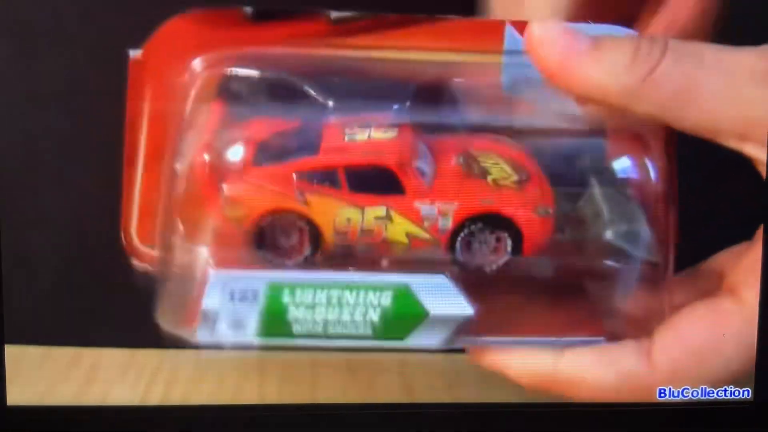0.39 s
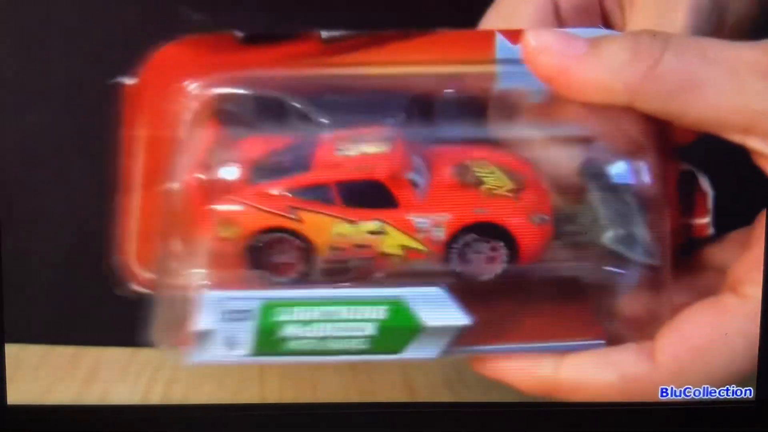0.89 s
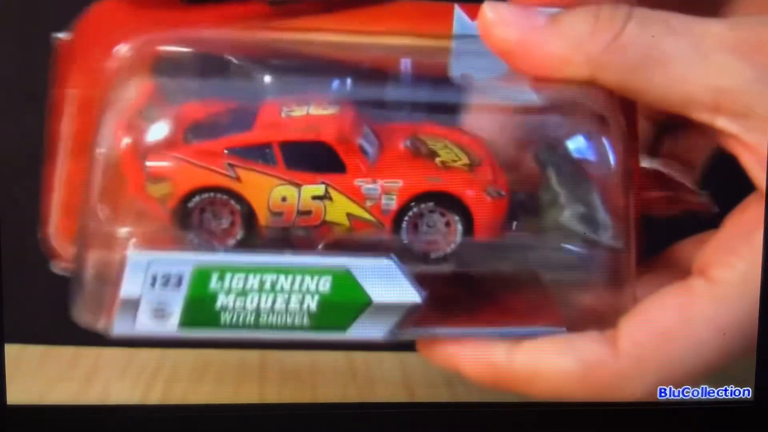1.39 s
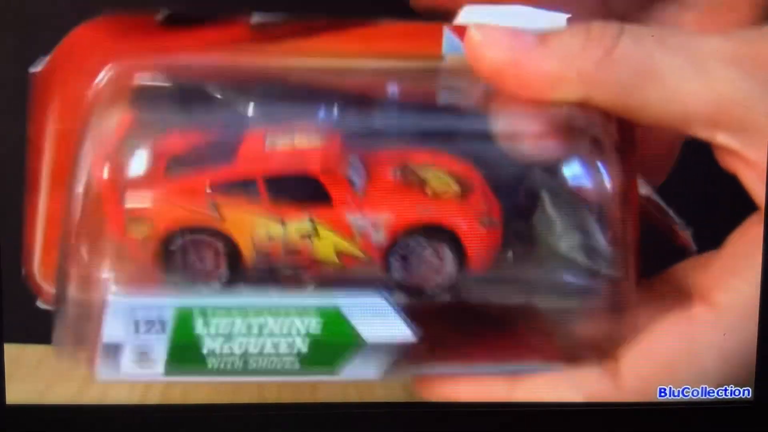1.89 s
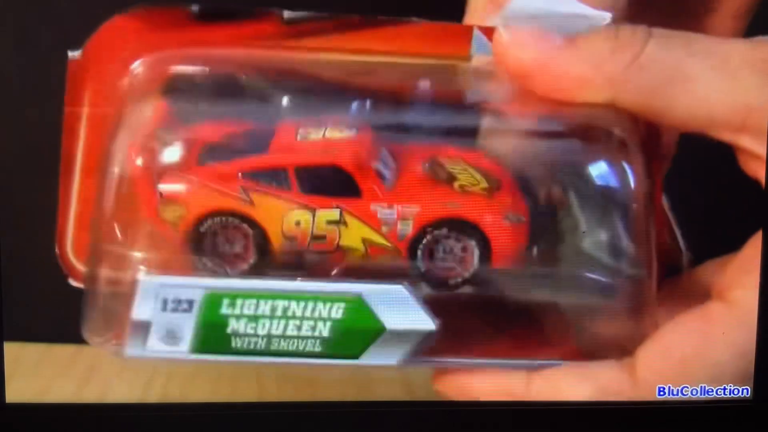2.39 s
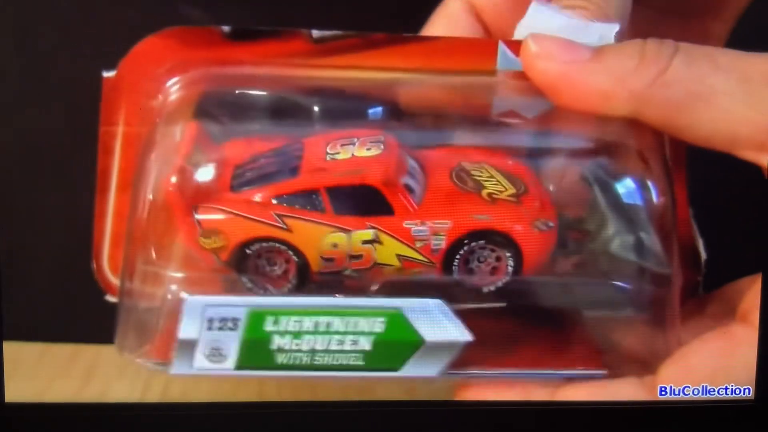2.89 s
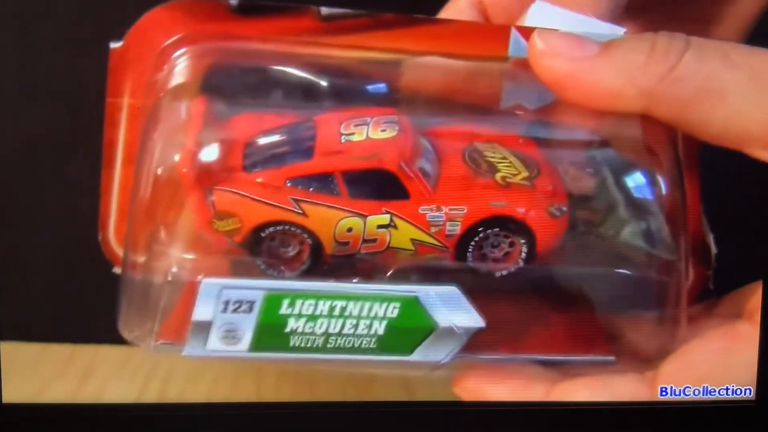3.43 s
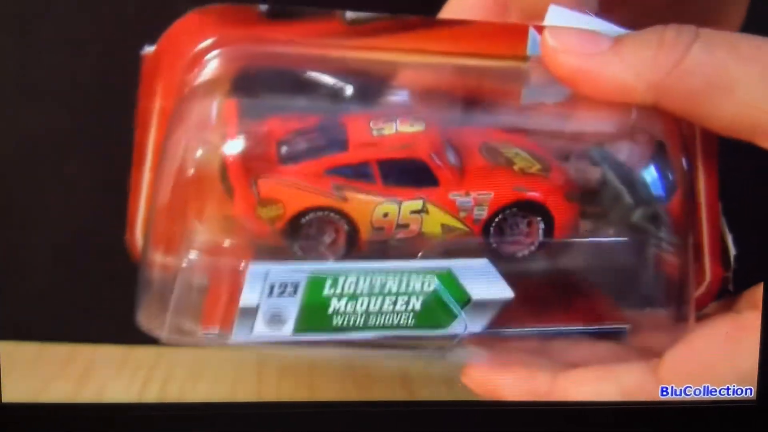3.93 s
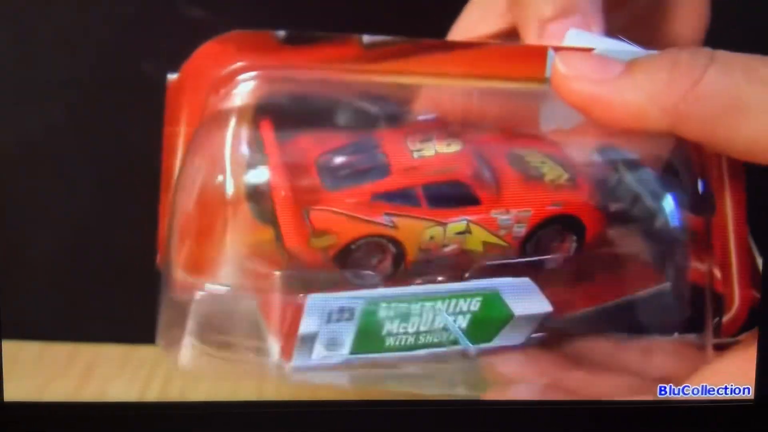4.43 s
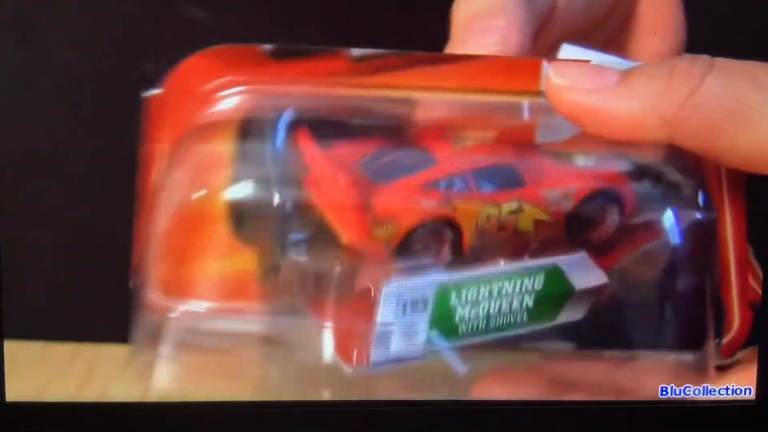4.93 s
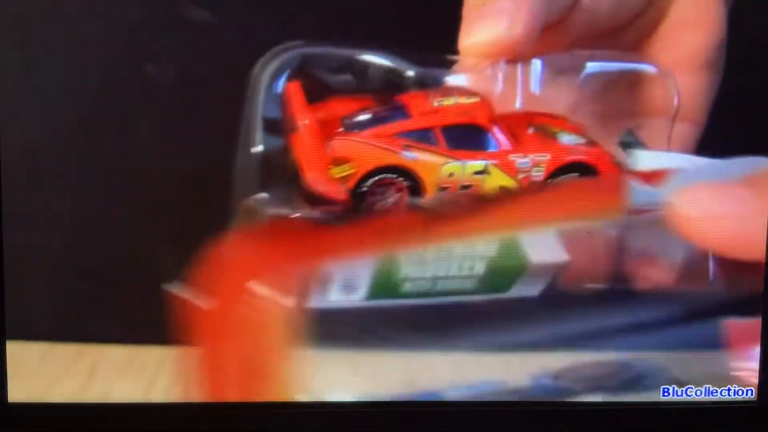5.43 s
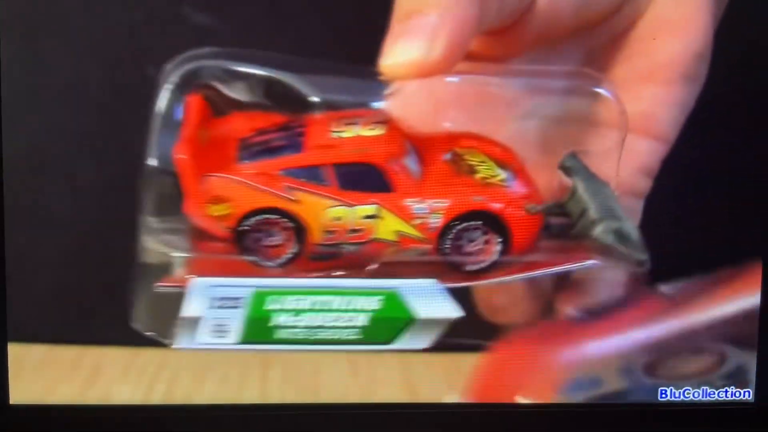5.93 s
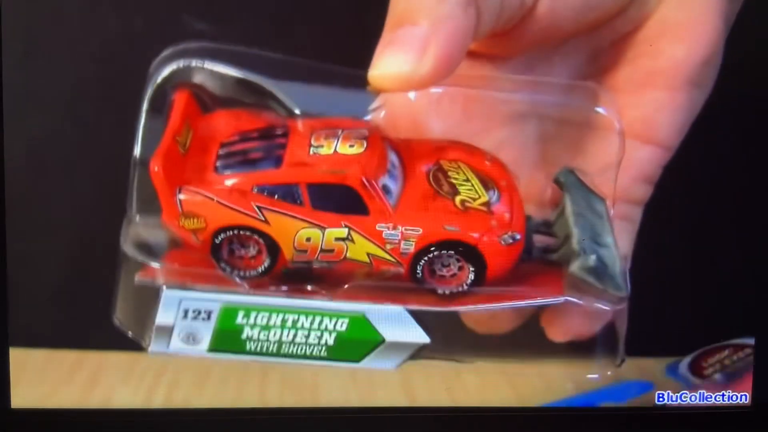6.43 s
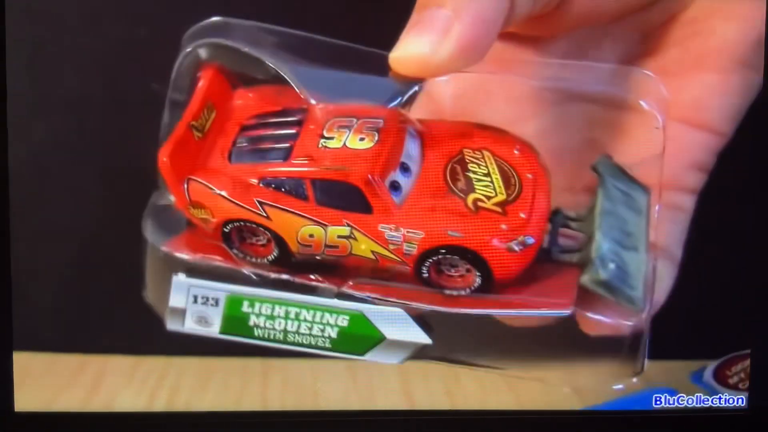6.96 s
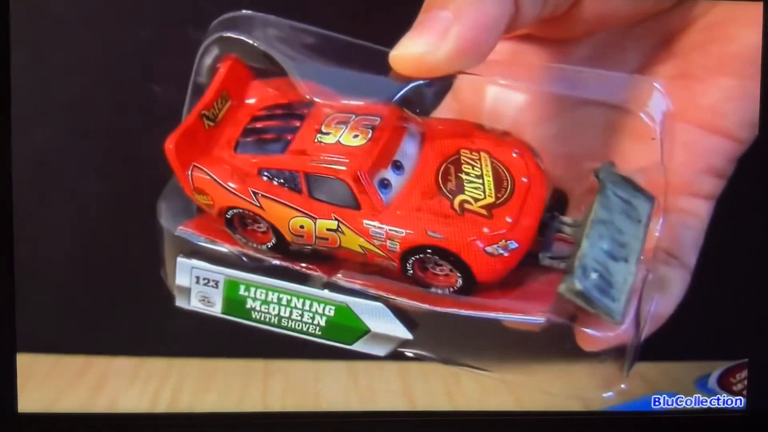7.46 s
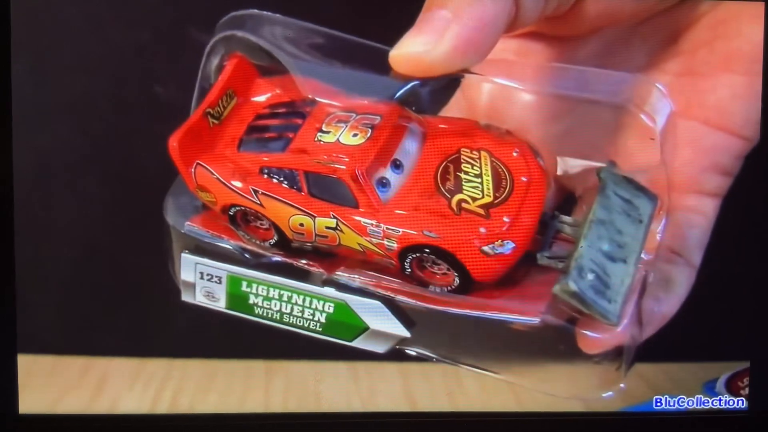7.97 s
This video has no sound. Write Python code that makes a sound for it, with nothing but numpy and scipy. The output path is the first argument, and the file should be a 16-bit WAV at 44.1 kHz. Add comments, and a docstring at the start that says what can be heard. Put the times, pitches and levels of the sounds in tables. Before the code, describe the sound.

A thin plastic blister pack on card is handled very close to the microphone in a small, quiet room. From 0 to 0.5 s there are dull card knocks and light crackles, then snaps thicken at 0.5-1.1 s with bright clicks. Dense crinkling and irregular buckling continue to about 2.9 s, especially sharp near 1.8 s. A lull from 3 to 3.5 s holds only light rustle; a crisp crack with a hollow pop lands at 3.6 s. Activity swells from 3.9, with a rapid flurry of snaps and card flops at 4.2-4.6 s. The hardest crack and hollow tok come at 5.17 s, another at 5.46 s. The tray slides out with scattered ticks and a faint thin slide near 6.3 s. From 7 to 8 s only tiny isolated clicks remain over soft air, low hum and a faint throb.

```python
"""Blister pack bent in the hands

Hands bend a thin plastic blister pack on its card up close, then slide the inner tray out and hold it.
The shell buckles in sharp snaps, shaped noise bursts over a dense crackle of tiny damped rings and hiss.
Card knocks, pitched clicks and hollow dome pops join in; air, low hum and a beating throb lie behind.
The near-mono pickup is widened by a filter network that delays the bass and notches each side."""
import sys
import numpy as np
from scipy import signal
from scipy.fft import rfft, irfft, next_fast_len
from scipy.io import wavfile
from scipy.ndimage import uniform_filter1d, map_coordinates

SR = 44100
rng = np.random.default_rng(int(sys.argv[2]) if len(sys.argv) > 2 else 0)


def log_audio(samples):
    """Write samples as a 16-bit WAV file to the path given in sys.argv[1]."""
    # one column per channel
    frames = np.atleast_2d(samples).T
    # limit to full scale, then quantise
    limited = np.clip(frames, -1, 1)
    pcm = np.round(limited * 32767).astype(np.int16)
    wavfile.write(sys.argv[1], SR, pcm)


def to_linear_factor(level_db):
    """Convert decibel levels (scalar or array-like) to linear amplitude factors."""
    exponent = np.asarray(level_db, float) / 20
    return 10 ** exponent


N = 356769
WARM_UP = 6001  # samples of extra room for the filters
FILTER_SIZE = next_fast_len(N + WARM_UP)
HZ = np.fft.rfftfreq(FILTER_SIZE, 1 / SR)


def unit(x):
    """Scale to rms 1."""
    return x / np.sqrt(np.mean(x ** 2) + 1e-20)


def along(points, hz, count=1):
    """Read a column of (Hz, ..) points on a log frequency axis."""
    table = np.transpose(points)
    return np.interp(np.log(hz + 1), np.log(table[0] + 1), table[count])


def curves(rows):
    """One value per sample for each column after the time."""
    s, *columns = np.transpose(rows)
    return [np.interp(np.arange(N) / SR, s, column) for column in columns]


def wobble(rate):
    """A smooth random curve with this many knots a second."""
    knots = rng.standard_normal(int(N * rate / SR) + 4)
    return map_coordinates(knots, [np.arange(N) * rate / SR])


def filtered(x, response):
    """Multiply the spectrum of x by a complex response on the grid HZ."""
    return irfft(rfft(x, FILTER_SIZE) * response, FILTER_SIZE)[..., :N]


def band(hz, low_hz, high_hz):
    """Gain of a soft-edged band."""
    return 1 / np.sqrt((1 + (low_hz / (hz + 1)) ** 12) * (1 + (hz / high_hz) ** 12))


def pitch_hump(hz, base_hz, octave, width_octaves):
    """Gain of a hump on a log axis, one row per pitch in octaves above base_hz."""
    distance = np.log2(hz / base_hz + 1e-3) - octave[:, None]
    return np.exp(-(distance / width_octaves) ** 2)


# Colour of the room air and the faint noise of each side. Each row: frequency in Hz,
# relative density in dB per Hz.
AIR_COLOUR = [(25, -33), (55, -29), (72, 1), (100, 3), (135, -2), (165, 5.5), (210, -8), (500, -6.5),
              (1200, -15.5), (2000, -12), (2800, -14.5), (4000, -23), (4500, -28.5), (5100, -20),
              (5700, -22), (6200, -22.5), (8000, -17), (9500, -30.5), (10600, -42), (12000, -136)]
# Low hum of unrelated wavering tones. Each row: pitch in Hz, usual level in dB rms.
HUM_TONES = [(117.2, -59.5), (96.7, -69), (161.5, -70.5), (172.6, -66.5), (241.4, -65), (356.6, -64.5)]
# Low throb. Each row: time in seconds, level in dB rms before the beating.
THROB_LEVEL = [(0, -66), (0.4, -69), (0.65, -50), (1.0, -69), (1.4, -54), (2.8, -64), (3.9, -56),
               (4.15, -57), (4.4, -86), (8.09, -79)]


def background():
    """Coloured noise for air, wavering sines for hum, a narrow low drone and a throb whose beats quicken."""
    t = np.arange(N) / SR
    air_noise = filtered(rng.standard_normal(N), to_linear_factor(along(AIR_COLOUR, HZ)))
    air = to_linear_factor(-50 + 0.06 * wobble(1.7)) * unit(air_noise)

    hum = np.zeros(N)
    for hz, db in HUM_TONES:
        level = np.sqrt(2) * to_linear_factor(db + 1.8 * wobble(8.3))
        hum += level * np.sin(2 * np.pi * hz * t + 0.5 * wobble(3))

    throb_hz, beat_depth = 56, 0.7
    since = t - 1.29  # seconds from a beat's peak
    beats = since * (4.35 + 0.204 * since)  # 4.35 a second at that peak, 0.408 more each second
    beat = 1 + beat_depth * np.cos(2 * np.pi * beats)
    tone = np.sqrt(2) * np.sin(2 * np.pi * throb_hz * t + 1.2 * wobble(2.68))
    throb = to_linear_factor(curves(THROB_LEVEL)[0]) * beat * tone

    drone = to_linear_factor(-64) * unit(filtered(rng.standard_normal(N), band(HZ, 54, 55)))
    return air + hum + throb + drone


# Decay of the room. Each row: frequency in Hz, time to fall 60 dB in seconds.
ROOM_DECAY = [(300, 0.7), (2000, 0.24), (9000, 0.19)]


def room(x):
    """Echo made of noise in which each frequency dies at its own speed, nearly alike on both sides."""
    alike, delay = 0.9, 300  # share common to both sides (0-1), delay in samples
    noise = rng.standard_normal((3, SR // 2))
    hz, t, grains = signal.stft(noise, SR, nperseg=256)
    decay = to_linear_factor(-60 * t / along(ROOM_DECAY, hz)[:, None])
    tail = signal.istft(grains * decay, SR, nperseg=256)[1]
    tail = alike * tail[0] + np.sqrt(1 - alike ** 2) * tail[1:]
    late = np.pad(x, (delay, 0))[None]
    return signal.fftconvolve(late, tail / np.linalg.norm(tail[0]), axes=1)[:, :N]


# Fingertip on the tray. One row: middle in seconds, half length in seconds, pitch in Hz,
# half width in Hz, level at the middle in dB rms before its flicker.
TRAY_SLIDE = (6.3, 0.22, 5150, 220, -65)


def slide():
    """A fingertip slides along the tray: a thin, narrow band of noise swells and fades with a flicker."""
    middle_s, half_s, hz, width_hz, db = TRAY_SLIDE
    swell = np.exp(-((np.arange(N) / SR - middle_s) / half_s) ** 2)
    flicker = to_linear_factor(1.7 * wobble(13))
    hiss = filtered(rng.standard_normal(N), np.exp(-((HZ - hz) / width_hz) ** 2))
    return to_linear_factor(db) * swell * flicker * unit(hiss)


# Colour of the flexing plastic. Each row: frequency in Hz, relative density in dB per Hz.
PLASTIC_COLOUR = [(150, 8), (300, -3.5), (430, -5), (750, -7), (1000, 2), (1150, -1.5), (1350, -5.5),
                  (1700, -2), (1950, 0.5), (2250, 2), (2800, 0), (3300, 5.5), (3800, -3), (5200, 6.5),
                  (7000, 0), (8200, 3.5), (9500, -7), (11000, -19.5), (13000, -28.5), (15500, -48)]
# Ring of the inner tray once it is out. One row: start in seconds, pitch in Hz, half width in Hz, boost in dB.
TRAY_RING = (5.78, 1530, 90, 7)


def bursts(s, ms, parts):
    """Each buckle is a short spiky noise burst; longer ones are clusters of creases giving way.

    parts: pairs of a gain as a function of Hz and a level in dB, as energy over 1 ms."""
    size, lead = 4096, 1024  # samples in all, samples ahead of the start
    length = ms[:, None]
    u = (np.arange(size) - lead) / SR / (length / 1000)  # time in burst lengths
    swell = np.clip(0.068 + 0.02 * length, 0.02, 0.4)  # long clusters creep in, short pops jump
    rise_and_fall = np.exp(-np.logaddexp(0, -u / swell) - (np.maximum(u, 0) / 0.95) ** 0.97)

    chance = rng.standard_normal((len(s), 3, size))
    spikes = to_linear_factor(4.5 * unit(uniform_filter1d(chance[:, 1], size=40)))
    jolt = chance[:, 0] * spikes * rise_and_fall
    # the panel flips in one clean push, if the burst is short
    push_at, push_ms = 0.352, 0.049  # in burst lengths, width in ms
    push = 1.55 / (1 + (length / 9) ** 2)
    jolt += push * np.exp(-0.5 * ((u - push_at) * length / push_ms) ** 2)

    hz = np.fft.rfftfreq(size, 1 / SR)
    # creases differ in brightness: dB per octave above 5 kHz
    tilt = to_linear_factor(3 * chance[:, 1, :1] * np.log2(np.maximum(hz, 5000) / 5000))
    # each bent panel has its own resonances, spread over a log axis
    smooth = unit(uniform_filter1d(uniform_filter1d(chance[:, 2], size=9), size=9))
    panel = to_linear_factor(2 * smooth[:, (40 * np.log2(hz + 100)).astype(int)])
    start_s, ring_hz, width_hz, ring_db = TRAY_RING
    panel *= to_linear_factor(ring_db * (s[:, None] > start_s) * np.exp(-((hz - ring_hz) / width_hz) ** 2))
    spectrum = rfft(jolt) * to_linear_factor(along(PLASTIC_COLOUR, hz)) * tilt * panel

    sound = np.zeros((len(s), size))
    for gain, db in parts:
        part = irfft(spectrum * gain(hz), size)
        energy_ms = np.sum(part ** 2, axis=1) * 1000 / SR
        sound += part * (to_linear_factor(db) / np.sqrt(energy_ms))[:, None]
    where = np.round(s * SR).astype(int)[:, None] + np.arange(size)
    return np.bincount(where.ravel(), sound.ravel(), N + 2 * size)[lead:N + lead]


CARD_HZ = (290, 620)  # the card's range, which a snap's body reaches down into

# Dull knocks of the card. Each row: start in seconds, level in dB as energy over 1 ms,
# length in ms, pitch in octaves above 300 Hz.
CARD_KNOCKS = [(0.001, -28.5, 3.2, -0.27), (0.013, -22.5, 6.5, -0.12), (0.036, -23, 3, 0.84),
               (0.1184, -26.5, 16, 0.98), (0.531, -22.5, 4.8, 0.35), (0.559, -23, 6.8, 1),
               (0.852, -12.5, 7, 0.59), (0.934, -24, 10.5, 0.69), (1.002, -30.5, 3.4, -0.046),
               (1.3912, -29, 16, 0.62), (1.501, -21, 10.3, 0.9), (1.6787, -25.5, 10, 0.42),
               (1.96, -29.5, 17, 0.72), (2.021, -32, 14, 0.26), (2.3016, -25.5, 4.4, -0.044),
               (2.562, -29, 20, 0.27), (2.633, -23, 13, 0.23), (2.7208, -30, 5.5, .3),
               (2.8744, -30, 10.4, 1), (3.87, -26.5, 4.6, .5), (3.956, -21.5, 8.3, 0.043),
               (4.163, -25.5, 11, 0.47), (4.2111, -21.5, 5.7, 0.79), (4.2894, -34, 7.6, 0.69),
               (4.307, -35, 3.4, 0.67), (4.3557, -20.5, 5.4, 0.26), (4.383, -31, 15, .5),
               (4.4099, -16.5, 4.3, 0.31), (4.471, -24.5, 6.9, -0.42), (4.5335, -23, 1.9, 0.95),
               (4.583, -32, 3.3, 0.7), (4.601, -26.5, 9.7, 0.61), (4.65, -32, 15, 0.95),
               (5.1048, -27, 3.2, .6), (5.17, -21, 5.2, 1), (5.3072, -26.5, 3.9, 0.52),
               (5.459, -25, 15, 0.6), (6.0572, -33, 13, 0.96)]


def knocks():
    """The card flops against shell and fingers: dull bursts, each humped about its own low pitch."""
    s, db, ms, octave = np.transpose(CARD_KNOCKS)

    def dull(hz):
        return band(hz, 255, 810) * pitch_hump(hz, 300, octave, 0.76)

    return bursts(s, ms, [(dull, db)])


# Single creases that flip. Each row: start in seconds, peak level in dB, pitch in Hz.
CREASE_CLICKS = [(0.7428, -26, 5600), (0.7515, -22, 3440), (0.9352, -17, 8450), (0.953, -8.5, 8200),
                 (1.0032, -19, 5380), (1.1246, -13.5, 8100), (1.4612, -18, 8160), (1.6, -25, 5300),
                 (1.7735, -19, 4390), (1.7891, -10.5, 4100), (1.8245, -17, 8500), (1.9125, -21, 6000),
                 (1.9595, -20, 8200), (1.9665, -19, 8200), (2.301, -30, 3330), (2.634, -23, 3420),
                 (2.849, -15, 8400), (2.8794, -12, 8400), (3.407, -33, 5270), (3.432, -33, 3460),
                 (3.5768, -11, 3360), (3.578, -16.5, 1020), (3.607, -33, 1020), (3.621, -25, 1900),
                 (3.627, -32, 1027), (3.954, -10.5, 3130), (4.137, -15.5, 3150), (4.273, -36, 3270),
                 (4.314, -20, 3300), (4.331, -26, 3270), (4.3537, -16, 3250), (4.392, -21, 3270),
                 (4.424, -18, 3300), (4.5313, -26, 3220), (4.6014, -18.5, 3340), (5.1722, -10, 8100),
                 (5.461, -25, 3450), (5.5864, -28.5, 8500), (5.717, -18.5, 4680), (7.012, -37, 3440),
                 (7.168, -50, 3200), (7.277, -50, 3300), (7.398, -47, 3200), (7.6465, -41, 3230),
                 (7.812, -46, 3200)]


def clicks():
    """A single crease flips with a sharp click: a few cycles at its own pitch."""
    s, db, hz = np.transpose(CREASE_CLICKS)[:, :, None]
    turns = hz * np.arange(900) / SR
    u = turns / 2.8  # the click swells for 2.8 cycles, then dies away
    ring = to_linear_factor(db) * (u * np.exp(1 - u)) ** 2 * np.sin(2 * np.pi * turns)
    where = np.round(s * SR).astype(int) + np.arange(900)
    return np.bincount(where.ravel(), ring.ravel(), N)


# Ringing modes of the blister. Each row: pitch in Hz, width in Hz, relative level in dB.
DOME_MODES = [(452, 26, -12), (1007, 8, -7), (1045, 10, -6), (1653, 8, -10), (1760, 10, -7), (1880, 9, -6),
              (1954, 7, -4), (2024, 7, -6), (3378, 66, -14), (5300, 82, -15)]


def dome(x):
    """The hollow blister rings on after every crease: a bank of resonances added to the sound."""
    ring = 0
    for hz, width, db in DOME_MODES:
        ring = ring + to_linear_factor(db) * 1j * HZ * width / (hz * hz - HZ * HZ + 1j * HZ * width)
    return filtered(x, 1 + ring)


# Pops of the whole dome. Each row: start in seconds, ring level in dB added to each mode's,
# peak level of the tok in dB, pitch of the tok in Hz.
POPS = [(0.534, -49, -24, 1840), (0.561, -49, -16.5, 2020), (3.578, -32, -6, 1855), (4.209, -38, -23, 1930),
        (5.157, -40, -10.5, 1870), (5.173, -40, -18, 1850), (5.461, -51, -10, 1730)]


def dome_pops():
    """The whole dome pops in or out with a hollow tok, striking every mode at once in a fresh mix."""
    scatter_db, tok_ms = 2, 1.3  # spread of mode levels, time for the tok to swell before it dies
    t = np.arange(SR // 2) / SR
    u = 1000 * t / tok_ms
    sound = np.zeros(N + SR)
    for s, ring_db, tok_db, tok_hz in POPS:
        pop = to_linear_factor(tok_db) * u * np.exp(1 - u) * np.sin(2 * np.pi * tok_hz * t)
        for hz, width, mode_db in DOME_MODES:
            level = to_linear_factor(ring_db + mode_db + scatter_db * rng.standard_normal())
            pop += level * np.exp(-np.pi * width * t) * np.sin(2 * np.pi * hz * t)
        sound[round(s * SR):][:len(t)] += pop
    return sound[:N]


def ticks(count, centre_hz, octaves, cycles, spread_db):
    """Tiny creases at random times, each a damped ring at its own pitch."""
    when, size = rng.random((2, count))
    hz = np.clip(centre_hz * 2 ** (octaves * rng.standard_normal((count, 1))), 200, 14000)
    turns = hz * np.arange(256) / SR
    size_db = spread_db * np.minimum(-np.log(size), 4)
    envelope = turns * np.exp(-turns / cycles)
    ring = to_linear_factor(size_db)[:, None] * np.sqrt(hz) * np.sin(2 * np.pi * turns) * envelope
    where = (when * N).astype(int)[:, None] + np.arange(256)
    return unit(np.bincount(where.ravel(), ring.ravel(), N + 256)[:N])


# Buckling snaps. Each row: start in seconds, crack level in dB and body level in dB, both as energy
# over 1 ms, body pitch in octaves above 1 kHz, length in ms.
BUCKLES = [(0.001, -50, -18.5, -0.74, 3.6), (0.0306, -19, -27, 0.84, 3.5), (0.0558, -24, -38, 0.5, 3.7),
           (0.0936, -20.5, -22, 0.51, 4.5), (0.108, -23, -22, 0.48, 18), (0.1197, -40, -22, 0.31, 7.5),
           (0.1486, -41, -26.5, -0.58, 13), (0.2054, -37, -39, -0.58, 5.6), (0.2384, -28, -59, 0.74, 6.8),
           (0.332, -29, -29, 0.42, 4.2), (0.3542, -30, -26, 0.39, 7), (0.416, -36, -39, 0.07, 7.1),
           (0.501, -24.5, -17.5, 0.34, 4.9), (0.5313, -25, -11.5, 0.075, 2.35),
           (0.56, -16.5, -17, 0.34, 4.15), (0.5653, -28, -20.5, -0.23, 12), (0.618, -32, -24.5, -0.15, 5.2),
           (0.634, -33, -23, 0.19, 4.5), (0.6526, -19, -26, 0.13, 21), (0.676, -28, -27, 0.42, 9.9),
           (0.692, -21, -23, 0.4, 4.8), (0.6995, -24, -15.5, 0.33, 2.4), (0.7295, -47, -15.5, 0.11, 2),
           (0.743, -36, -26, 0.65, 6.7), (0.7506, -16, -22.5, 0.2, 16), (0.8232, -20, -20, 0.36, 23),
           (0.897, -26.5, -17, 0.58, 3.9), (0.9351, -15.5, -17, 0.81, 12), (0.952, -12, -21.5, 0.33, 10.7),
           (1.0014, -12.5, -21, 0.31, 4.7), (1.015, -14, -17.5, 0.44, 22), (1.082, -21.5, -62, 0.55, 17),
           (1.1255, -29.5, -51, 0.15, 1.5), (1.1658, -26.5, -25, 0.51, 26),
           (1.211, -25.5, -21.5, 0.54, 5.9), (1.2331, -20.5, -23.5, 0.27, 18),
           (1.2919, -19.5, -22.5, 0.24, 8.7), (1.3912, -16, -19, 0.62, 10.3), (1.4596, -18, -14, 0.39, 4.3),
           (1.4975, -20.5, -20, 0.49, 22), (1.535, -33, -31, 0.012, 4.2), (1.5614, -24, -17, 0.57, 6.7),
           (1.6018, -38, -22, -0.00069, 3.8), (1.618, -14.5, -19, 0.43, 3.3),
           (1.6637, -18, -20, 0.37, 19.4), (1.774, -16.5, -32, -0.14, 6.4), (1.7891, -9.5, -19, 0.036, 5.1),
           (1.7953, -11.5, -12.5, 0.43, 9.6), (1.8104, -12, -20, 0.69, 3.8),
           (1.817, -14, -21.5, 0.084, 15.5), (1.863, -22, -24, 0.31, 4.2), (1.888, -18.5, -24.5, 0.51, 21),
           (1.902, -26, -18, 0.22, 6.8), (1.914, -17, -24, 0.47, 29), (1.9584, -15, -21.5, 0.074, 9.5),
           (2.0119, -30, -20, 0.19, 10), (2.0517, -34, -34, -0.15, 6.6), (2.102, -29, -33, 0.49, 5.4),
           (2.21, -28, -34, 0.29, 2.6), (2.231, -16, -18.5, 0.29, 14.6), (2.3025, -18, -13.5, 0.58, 14.4),
           (2.3315, -19, -14.5, 0.16, 5.2), (2.337, -20.5, -22.5, 0.083, 17),
           (2.4044, -17, -25, -0.0045, 14.3), (2.5065, -20.5, -21.5, 0.58, 5.9),
           (2.5267, -20.5, -22.5, -0.053, 11), (2.56, -15.5, -16, 0.32, 16.6),
           (2.615, -23.5, -18.5, 0.24, 14), (2.633, -17.5, -11, 0.25, 6.8), (2.722, -48, -34.5, 0.28, 5.3),
           (2.796, -31, -25, 0.37, 9.5), (2.8502, -15, -13, 0.33, 12.2), (2.8747, -19.5, -23.5, -0.3, 20),
           (2.8955, -34, -22, 0.95, 11), (2.9923, -34, -33.5, 0.35, 5.8), (3.1872, -34.5, -32, -0.021, 3.5),
           (3.328, -39, -42, 1, 3), (3.3384, -34.5, -35, 1.8, 1.85), (3.4096, -49, -32, 0.42, 17),
           (3.4189, -33.5, -32.5, 0.15, 12), (3.571, -23, -24, 0.51, 5.9), (3.5768, -9.5, -19, 0.79, 1.7),
           (3.6042, -48, -41, 0.89, 5.3), (3.6227, -37, -20, 1.1, 6), (3.706, -45, -26.5, 0.015, 4.9),
           (3.747, -34, -28, -0.19, 16.6), (3.7823, -36, -38, 0.42, 2.3), (3.8699, -23, -21.5, 0.77, 5),
           (3.9243, -37, -28, 1.2, 4), (3.945, -44, -18, 0.15, 5.3), (3.956, -18, -12, 0.29, 8.8),
           (4.121, -43, -27, -0.14, 3.7), (4.1356, -29.5, -22, 0.61, 3.8), (4.153, -23.5, -17, -0.31, 5.8),
           (4.1599, -26, -20, 0.051, 22), (4.2101, -15, -12, 0.86, 2.52), (4.2754, -36, -15, 1.66, 2),
           (4.2856, -23, -19.5, -0.011, 11.4), (4.298, -23.5, -23, -0.7, 5.3), (4.308, -29, -27, 0.65, 7),
           (4.3229, -20, -15, 1.66, 9.1), (4.353, -17, -16, -0.041, 12.5), (4.376, -17.5, -15.5, 1.6, 10.8),
           (4.384, -16.5, -18, 1.4, 10), (4.407, -15.5, -10.5, 0.69, 9), (4.417, -16, -18, 1.4, 9.8),
           (4.4554, -26, -22, 1.9, 7), (4.4653, -20.5, -13, 0.16, 5.3), (4.4719, -29, -18.5, 0.64, 5.3),
           (4.484, -22.5, -29, 1.4, 2.7), (4.5322, -18, -15, 0.44, 3.5), (4.5786, -47, -20.5, 0.23, 2.95),
           (4.594, -25, -22, 0.18, 6), (4.6045, -18, -13.5, 0.71, 6.8), (4.649, -38, -20, 0.23, 12),
           (4.678, -36, -28, 0.63, 5.8), (4.6908, -35, -25, 1.34, 3.5), (4.7577, -28.5, -43, 0.8, 3.7),
           (4.7783, -37.5, -23.5, 1.65, 5.3), (4.795, -38, -27.5, 0.39, 2.9), (4.845, -40, -31, -0.64, 3.4),
           (4.861, -37, -30, 0.6, 5.8), (4.8901, -25, -22.5, 0.31, 8), (4.9145, -26, -23.5, -0.26, 3.2),
           (4.9601, -27.5, -20.5, 0.18, 11.3), (4.992, -21.5, -28, -0.019, 13),
           (5.052, -30.5, -44, 0.3, 5.1), (5.068, -31, -38, 0.61, 3), (5.0822, -22.5, -32, 0.79, 3.2),
           (5.1044, -22.5, -16.5, 0.39, 5.3), (5.1377, -24, -26, 0.66, 10),
           (5.1565, -20, -16.5, -0.33, 2.9), (5.1711, -8.5, -10.5, 0.58, 3.6),
           (5.3077, -27.5, -17.5, 0.38, 3.1), (5.334, -26.5, -24.5, 1.1, 4.8),
           (5.3796, -23, -22.5, 0.74, 4.6), (5.4606, -18, -17, 0.72, 3.3), (5.4687, -25, -13.5, 0.91, 4.4),
           (5.4883, -41, -37, 1.5, 20), (5.542, -48, -32.5, 0.51, 5.9), (5.587, -29, -33.5, 0.69, 3.1),
           (5.717, -26.5, -24, 0.66, 3.5), (5.841, -54, -34, 0.43, 4), (5.9723, -42, -33, 0.42, 4),
           (6.0579, -37, -32, 0.53, 4.2), (6.4197, -53, -33.5, 0.55, 3.5), (6.469, -45, -32.5, 1.05, 2.8),
           (6.493, -42.5, -41, 1, 2.6), (6.767, -58, -40, 0.6, 4.1), (6.8415, -53, -34.5, 0.54, 4.4),
           (7.0158, -39, -30.5, 0.51, 1.3), (7.168, -58, -37, 0.72, 1.85), (7.215, -58, -45, 0.45, 3.1),
           (7.276, -57, -37.5, 0.2, 4.2), (7.3972, -55, -37.5, 0.44, 3.3), (7.6464, -45, -32.5, 0.61, 1.38),
           (7.8124, -53, -35, 0.4, 3.8)]


def stirred(column, over_db, gathers_s, settles_s):
    """Crackle power around the listed snaps: stress gathers before each and settles after it."""
    t = np.arange(-SR // 2, SR // 2 + 1) / SR
    rows = np.transpose(BUCKLES)
    power = to_linear_factor(rows[column] + over_db) ** 2
    blows = np.bincount(np.round(rows[0] * SR).astype(int), power, N)
    shape = np.exp(np.where(t < 0, t / gathers_s, -t / settles_s))
    return np.abs(signal.fftconvolve(blows, shape, mode="same"))


# How hard the hands work the pack. Each row: time in seconds, effort in dB.
EFFORT = [(0.0, -33.5), (0.17, -41), (0.23, -45), (0.34, -45.5), (0.54, -56.5), (0.7, -40.5), (0.85, -46),
          (1.58, -51), (1.8, -50), (2.05, -45), (2.21, -48), (2.43, -41), (2.5, -40.5), (2.59, -47),
          (3.15, -51.5), (3.38, -52), (3.81, -46.5), (3.92, -38.5), (4.19, -56), (4.35, -48), (4.71, -45.5),
          (5.11, -42), (5.27, -52.5), (5.5, -53), (5.99, -52.5), (7.52, -67), (8.09, -65)]


def crackle():
    """Countless small creases tick in clumps while fingers slide on the plastic; a light touch only slides."""
    effort_db, = curves(EFFORT)
    crinkle_power = to_linear_factor(effort_db - 4.5) ** 2
    crinkle_power = crinkle_power + stirred(1, over_db=-34.5, gathers_s=0.025, settles_s=0.036)
    rustle_power = to_linear_factor(-47.5 + 0.98 * (effort_db + 47)) ** 2
    rustle_power = rustle_power + stirred(2, over_db=-24, gathers_s=0.0056, settles_s=0.015)
    # creases start to tick above -60 dB and are in full force 8 dB higher
    bending = np.clip((10 * np.log10(crinkle_power) + 60) / 8, 0, 1)
    fine = bending * ticks(count=4000, centre_hz=5660, octaves=0.723, cycles=3.9, spread_db=3.5)
    coarse = bending * ticks(count=2500, centre_hz=1237, octaves=1.0, cycles=0.86, spread_db=2.0)

    sliding = 1.45  # finger noise against the ticks
    clumps = to_linear_factor(2.5 * bending * wobble(50))
    colour = to_linear_factor(along(PLASTIC_COLOUR, HZ))
    bright = clumps * (fine + sliding * rng.standard_normal(N))
    crinkle = filtered(bright, colour * band(HZ, 2250, 10500))
    hollow = clumps * (coarse + sliding * rng.standard_normal(N))
    rustle = filtered(hollow, colour * band(HZ, 240, 2610))
    return np.sqrt(crinkle_power) * unit(crinkle) + np.sqrt(rustle_power) * unit(rustle)


def all_snaps():
    """The listed snaps, then lesser ones at random whose strength follows the hands until the tray is out."""
    count = 24
    chance = rng.standard_normal((count, 4))
    s = (np.arange(count) + rng.random(count)) / count * TRAY_RING[0]
    crack_db, body_db = np.interp(s, *np.transpose(EFFORT)) + 1 + 4 * chance[:, :2].T
    octave = 0.42 + 0.13 * chance[:, 2]
    ms = 3.93 * 2.0 ** chance[:, 3]
    return np.hstack([np.transpose(BUCKLES), [s, crack_db, body_db, octave, ms]])


def snaps():
    """The shell buckles: a bright crack over a hollow body with a pitch of its own."""
    s, crack_db, body_db, octave, ms = all_snaps()

    def crack(hz):
        return band(hz, 2600, 16000)

    def body(hz):
        skirt = to_linear_factor(-6)  # level away from the hump
        return band(hz, 650, 2600) * (skirt + pitch_hump(hz, 1000, octave, 0.44))

    def depth(hz):
        return band(hz, *CARD_HZ)

    depth_db = body_db - 17 - 11.5 * octave  # higher bodies reach down less
    return bursts(s, ms, [(crack, crack_db), (body, body_db), (depth, depth_db)])


def scene():
    """The pack with its echo, nearly alike on both sides, over the background."""
    pack = dome(snaps() + knocks() + crackle()) + dome_pops() + clicks() + slide()
    return pack + to_linear_factor(-15.0) * room(pack) + background()


def roll_off(x):
    """The treble ends steeply here."""
    return signal.sosfilt(signal.butter(12, 15760, fs=SR, output="sos"), x)


# Stereo spreader. Each row: frequency in Hz, left over right in dB, lead of the right in radians.
SPREADER = [(60.0, -0.6, 0.03), (150.0, -2.3, -0.03), (400.0, -2.3, -0.17), (520.0, 0.8, -0.56),
            (700.0, 7.5, -1.07), (850.0, 11.4, -1.3), (930.0, 21.5, -0.6), (1000.0, 18.1, 0.43),
            (1150.0, 11.6, 1.49), (1400.0, 2.3, 1.48), (1900.0, -0.3, 2.16), (2700.0, -2.0, 3.21),
            (3200.0, -1.8, 4.42), (3800.0, -1.1, 5.84), (5100.0, -0.0, 6.24), (5350, -0.5, 6.4),
            (5700.0, -10.5, 6.41), (6300.0, -9.2, 5.45), (6900.0, -7.6, 4.57), (7400, -0.5, 4.8),
            (8000, -0.6, 6.05), (10000, 0.2, 6.55)]


def record(dry):
    """An all-pass delays the bass, the sides get their own gains and phases, and loud peaks saturate."""
    cycles = 7  # each tone lags by 7 periods of a tone 60 Hz higher, less 1.4 ms
    drag = np.exp(-2j * np.pi * cycles * (np.log(HZ + 60) - HZ / 5000))
    ratio = to_linear_factor(along(SPREADER, HZ))
    lead = along(SPREADER, HZ, count=2)
    left_right = np.array([ratio * np.exp(-0.5j * lead), np.exp(0.5j * lead)])
    sides = np.sqrt(2 / (1 + ratio ** 2)) * left_right

    # faint low noise, drawn separately for left and right
    noise_colour = to_linear_factor(along(AIR_COLOUR, HZ)) * band(HZ, 20, 1200)
    side_noise = to_linear_factor(-63) * unit(filtered(rng.standard_normal((2, N)), noise_colour))
    # the opening, reversed, wraps round so the filters start warm
    running = np.concatenate([dry, dry[:, WARM_UP - 1::-1]], axis=1)
    wide = filtered(running, drag * sides) + side_noise
    soft = wide / (1 + np.abs(wide / 0.95) ** 6) ** (1 / 6)  # peaks saturate towards 0.95
    return roll_off(soft)


dry = scene()
out = record(dry)
log_audio(out)
```